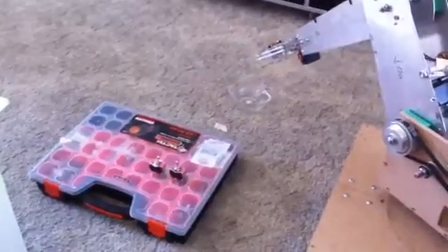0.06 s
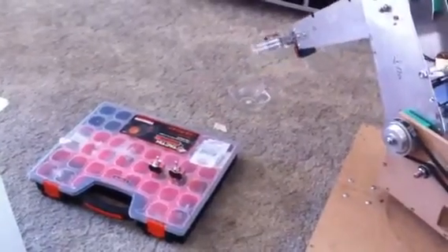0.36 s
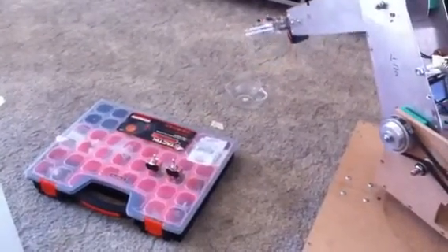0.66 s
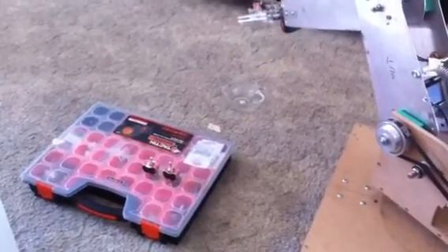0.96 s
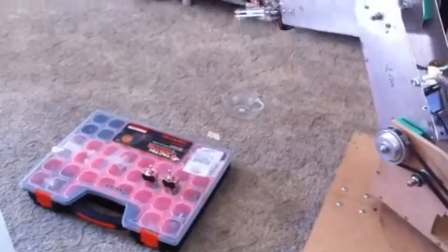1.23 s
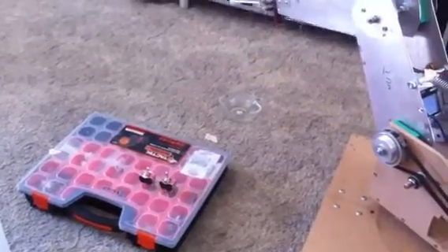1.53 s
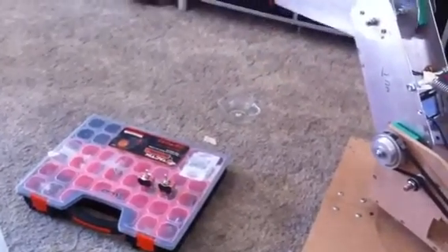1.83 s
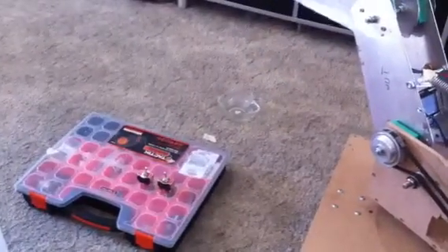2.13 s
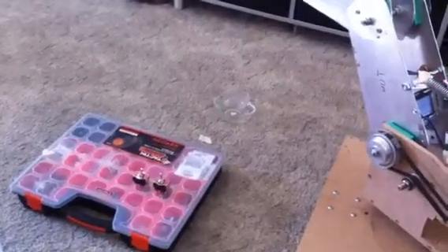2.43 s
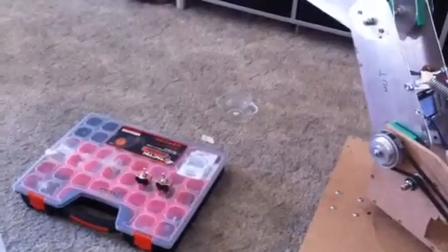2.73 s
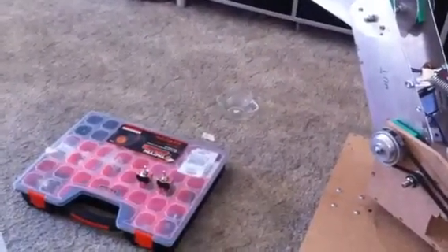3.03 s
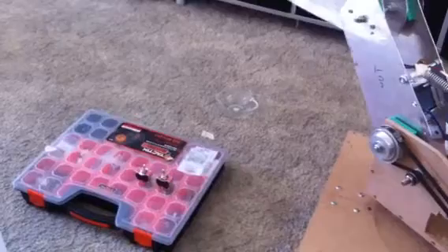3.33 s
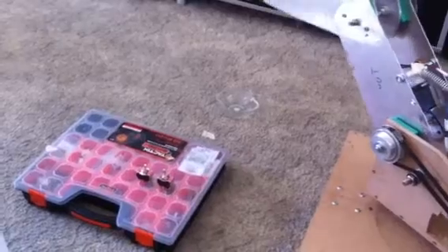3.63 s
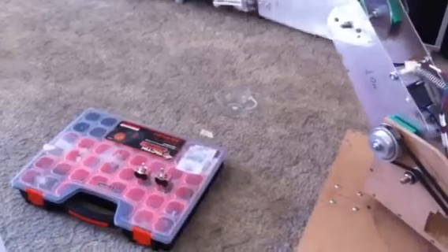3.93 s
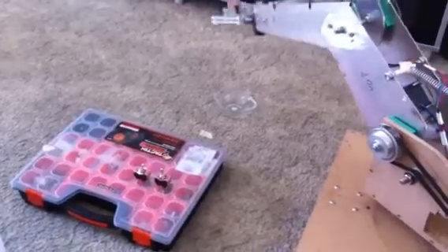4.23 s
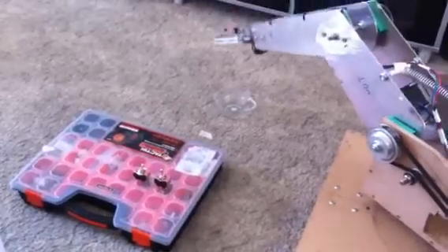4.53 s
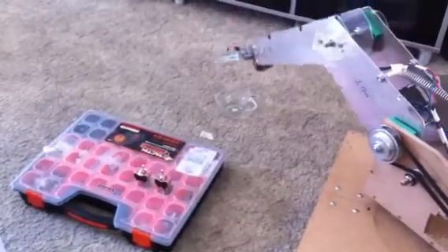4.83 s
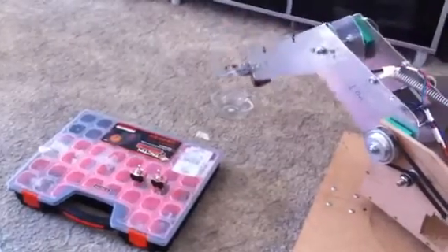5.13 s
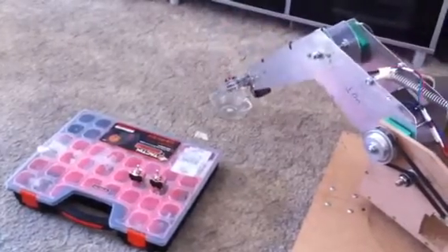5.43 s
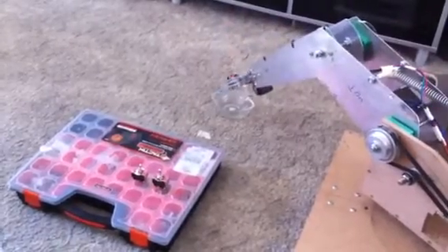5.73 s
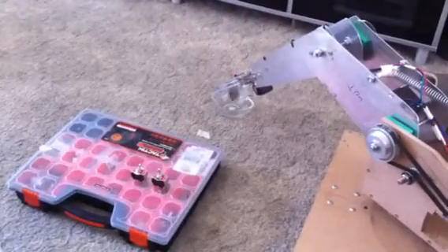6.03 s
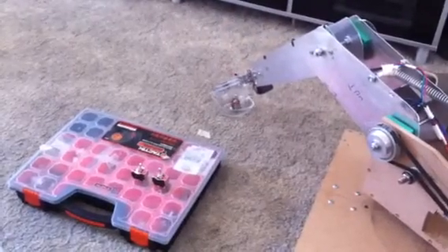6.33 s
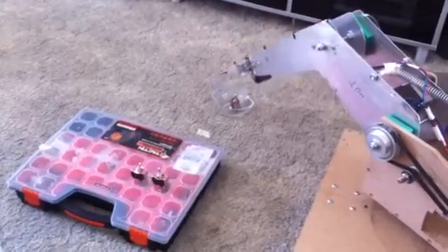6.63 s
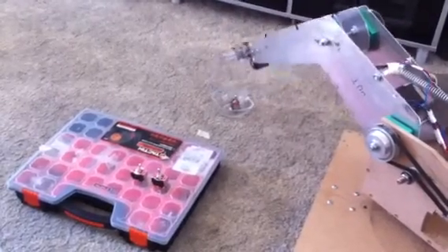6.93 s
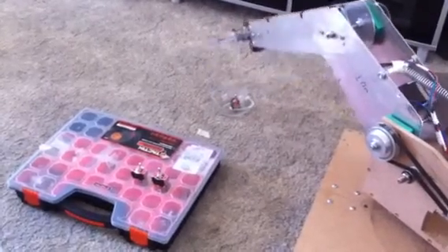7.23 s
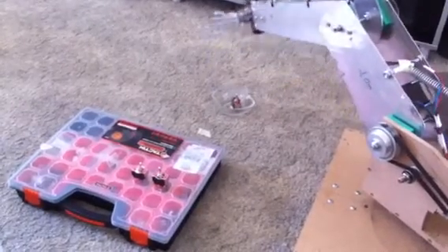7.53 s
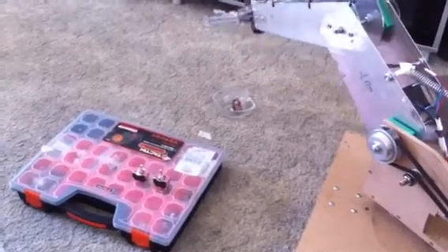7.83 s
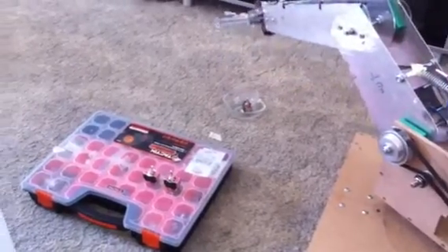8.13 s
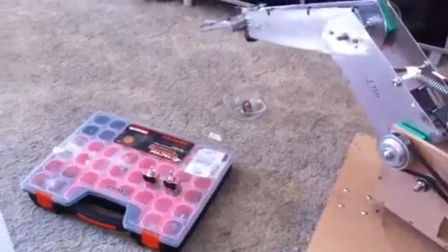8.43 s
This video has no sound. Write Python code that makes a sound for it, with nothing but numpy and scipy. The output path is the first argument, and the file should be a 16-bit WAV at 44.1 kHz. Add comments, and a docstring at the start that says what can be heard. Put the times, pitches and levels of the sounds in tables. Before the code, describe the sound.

A homemade robot arm moves in a carpeted room, close to a small microphone. After a brief whine, a stepper motor buzzes over grinding gears, pauses, then drones again. A small servo whirrs and a metal part drops into a glass dish with one sharp, ringing click. The motor buzzes once more with light ticks and gives way to softer whining, with a faint electrical sizzle throughout.

```python
"""Homemade robot arm at work

A carpeted room, a small microphone close to the arm. Stepper motors lift, lower and lift it again,
jolting the frame into a buzzing drone over grinding gears. Lighter motors whine before and after,
and the powered coils sizzle. Between the swings down and up, a servo works the gripper, which drops
a small metal part into a glass dish with one sharp, ringing click."""
import sys
import numpy as np
from scipy import signal
from scipy.fft import rfft, irfft, next_fast_len
from scipy.io import wavfile
from scipy.ndimage import uniform_filter1d, map_coordinates

SR = 44100
rng = np.random.default_rng(int(sys.argv[2]) if len(sys.argv) > 2 else 0)


def dump_mix(stems):
    """Bounce the given channels to the path in sys.argv[1] as a 16-bit WAV at rate SR."""
    frames = np.atleast_2d(stems).T  # one column per channel
    limited = np.clip(frames, -1, 1)  # hard clip at full scale
    pcm = np.round(limited * 32767).astype(np.int16)
    wavfile.write(sys.argv[1], SR, pcm)


N = 382347
T = np.arange(N) / SR
CYCLE_HZ, STEPS_PER_CYCLE, FIRST_STEP_S = 38.02, 8, 0.326  # the stepper drive

# the stepper's first lift: start_s, stop_s
LIFT_RUNS = [(.32, 2.59)]
# its swings, down and then up: start_s, stop_s
SWING_RUNS = [(3.152, 5.485), (6.583, 7.765)]
# high modes of the motor housings: pitch_hz, width_hz, level_db
COIL_MODES = [(4250, 34, -4), (4335, 25, 0), (4400, 19, 2.5), (4485, 24, -4), (4770, 19, -8)]
# spectrum of the booming side plates: frequency_hz, level_db
PLATE_SPECTRUM = [(150, -36.5), (235, -17), (268, 3.5), (300, -19), (345, -13), (500, -68)]


def amp(db):
    """Decibels to gain."""
    return 10 ** (np.asarray(db) / 20)


def unit(x):
    """Scale to rms 1."""
    return x / np.sqrt(np.mean(x ** 2) + 1e-20)


def along(points, hz):
    """Read (frequency_hz, value) points on a log frequency axis."""
    frequencies, values = np.transpose(points)
    return np.interp(np.log(hz + 1), np.log(frequencies + 1), values)


def wobble(knots_per_s, t=T):
    """A smooth random curve."""
    return map_coordinates(rng.standard_normal(int(t[-1] * knots_per_s) + 5), [t * knots_per_s])


def progress(start, stop):
    """0 at the start of a run, rising evenly to 1 at its stop."""
    return np.clip((T - start) / (stop - start), 0, 1)


def swell(middle_s, half_length_s):
    """A smooth bump of height 1."""
    return np.exp(-.5 * ((T - middle_s) / half_length_s) ** 2)


def surge(cycles, depth):
    """A gain that peaks once a cycle."""
    return np.exp(depth * np.cos(2 * np.pi * cycles))


def running(runs, rise_s, fall_s):
    """1 while a motor runs, dying away after each stop."""
    return sum(progress(on, on + rise_s) * np.exp(-np.maximum(T - off, 0) / fall_s) for on, off in runs)


def filtered(x, response):
    """Filter x by a gain given as a function of frequency."""
    size = next_fast_len(N + SR // 2)
    return irfft(rfft(x, size) * response(np.fft.rfftfreq(size, 1 / SR)), size)[:N]


def noise(spectrum, drive=1):
    """Coloured noise of rms 1, excited in proportion to drive."""
    return unit(filtered(drive * rng.standard_normal(N), lambda hz: amp(along(spectrum, hz))))


def resonant(modes, drive=1):
    """Noise of rms 1 ringing in narrow modes of alternating sign."""
    def response(f):
        return sum((-1) ** k * amp(db) * 1j * f * width / (hz * hz - f * f + 1j * f * width)
                   for k, (hz, width, db) in enumerate(modes))
    return unit(filtered(drive * rng.standard_normal(N), response))


def drive_cycles(slop):
    """Drive cycles since the first step; the rotor hunts slightly about its clocked position."""
    return CYCLE_HZ * (T - FIRST_STEP_S) + slop * (wobble(12) + wobble(45))


def whines():
    """Light motors each sing one unsteady tone; the first also whirrs and rings its gears."""
    # light motor runs: start_s, stop_s, first_pitch_hz, last_pitch_hz, level_db
    runs = [(0, 0.321, 370.7, 348, -51), (7.768, 8.632, 322.4, 313.5, -53), (8.272, 8.647, 530, 530, -50.5)]
    # the first motor's gear tones: pitch_hz, width_hz, level_db
    gear_modes = [(1440, 18, -9), (1600, 32, -22), (1730, 25, -10), (1886, 33, 1), (2033, 18, 2.5),
                  (2650, 44, -11), (4160, 27, -2), (4320, 16, -7), (4450, 20, -6), (4470, 11, 7),
                  (4660, 14, -6)]
    # its whirr: frequency_hz, level_db
    whirr_spectrum = [(110, -36), (190, -11), (260, 3.5), (350, -3.0), (450, -8), (540, -9),
                      (800, -28), (1300, -32.5)]
    tones = np.zeros(N)
    for start, stop, first_hz, last_hz, db in runs:
        hz = first_hz + (last_hz - first_hz) * progress(start, stop) ** 3.1  # a slowing motor sags late
        phase = 2 * np.pi * np.cumsum(hz * (1 + 0.005 * wobble(30))) / SR
        level = running([(start, stop)], rise_s=0.012, fall_s=0.028) * amp(db + 1.7 * wobble(25))
        tones += level * unit(np.sin(phase))
    whirr = amp(-53.5) * noise(whirr_spectrum)
    gear_ring = amp(-51.5) * resonant(gear_modes)
    return tones + running([runs[0][:2]], rise_s=0.0012, fall_s=0.018) * (whirr + gear_ring)


def coils():
    """Chopped coil current makes the motor housings sizzle and whistle, even at rest."""
    # coils under current: on_s, off_s, low_ring_gain_db, high_ring_gain_db
    runs = [(0, 0.34, -54, -57), (.33, 2.61, -53.5, -61.5), (2.63, 3.33, -62.5, -77),
            (3.62, 5.45, -62, -74.5), (5.47, 9.3, -63.5, -80)]
    # low modes of the motor housings: pitch_hz, width_hz, level_db
    housing_modes = [(1436, 26, -9), (1554, 43, -6.5), (1733, 36, -4), (1808, 19, -2), (1885, 38, -7.5),
                     (1995, 75, -5), (2325, 45, -10), (2670, 93, -12.5)]
    # spectra of the low ring, high ring, whistle and idle noise: frequency_hz, level_db
    low_spectrum = [(1100, -45), (1550, -11.5), (1800, -4.5), (2050, -1), (2420, -6.5), (2680, -10),
                    (3000, -19), (5000, -38)]
    high_spectrum = [(2800, -23), (3900, -13), (4250, -10), (4480, -8), (4750, -13), (5400, -23),
                     (6200, -17), (9000, -45)]
    whistle_spectrum = [(4100, -31), (4420, -9), (4650, -28), (4820, -7.5), (4950, 3.5), (5090, -11),
                        (5500, -42)]
    idle_spectrum = [(25, 2.5), (70, -30), (130, -20), (270, -7.5), (420, -8.5), (530, -1), (800, -15.5),
                     (1300, -20), (2100, -24), (3300, -25.5), (6300, -26), (8700, -29), (10500, -31),
                     (12300, -23), (14300, -36), (15500, -32)]
    # in the lift the low ring pulses with the drive and the high ring grows
    lifting = running(LIFT_RUNS, rise_s=.01, fall_s=.03)
    pulsing = surge(drive_cycles(slop=0.035) - .44, depth=0.1 * lifting)
    growth_db = 4 * lifting * progress(*LIFT_RUNS[0]) ** 2
    chatter = surge(179 * T, depth=0.17) * np.exp(0.17 * wobble(300))
    low = amp(-4) * noise(low_spectrum, chatter * pulsing)
    low += amp(-3.5 + 1.1 * wobble(40)) * resonant(housing_modes, chatter * pulsing)
    high = amp(-2.5) * noise(high_spectrum, chatter) + amp(-5) * resonant(COIL_MODES, chatter)
    high *= amp(growth_db)
    sizzle = np.zeros(N)
    for on, off, low_db, high_db in runs:
        powered = running([(on, off)], rise_s=0.0025, fall_s=0.012)
        sizzle += powered * (amp(low_db) * low + amp(high_db) * high)
    whistle = amp(-70.5 + 2.1 * wobble(9)) * noise(whistle_spectrum)
    return sizzle + whistle + amp(-55.5) * noise(idle_spectrum)


def frame_buzz(overtones, cycles, size=2048):
    """Each drive cycle jolts the frame, which rings on until the next jolt."""
    multiples = np.arange(size // 2 + 1)
    gain = amp(np.interp(multiples, *np.transpose(overtones), left=-45, right=-70))
    cepstrum = irfft(np.log(gain))
    jolt = irfft(np.exp(rfft(2 * cepstrum[1:size // 2], size)))  # minimum phase: the energy comes first
    return unit(np.interp(cycles % 1 * size, np.arange(size), jolt - jolt.mean()))


def registers(x, edges_hz=(420, 720)):
    """The low, middle and top parts of x, each of rms 1."""
    low, below_top = [filtered(x, lambda hz: 1 / (1 + (hz / edge) ** 20)) for edge in edges_hz]
    return unit(low), unit(below_top - low), unit(x - below_top)


def teeth(cycles, depth):
    """Gear teeth bite hardest twice a drive cycle."""
    return surge(2 * cycles, depth)


def lift():
    """The stepper raises the forearm; its throbbing buzz brightens as the arm rises."""
    # the frame's answer to one drive cycle: cycle_rate_multiple, level_db
    overtones = [(3, -47), (4, -34), (5, -6.5), (6, -1.5), (7, -7.5), (8, -18), (9, -22), (10, -12),
                 (11, -16), (12, -20), (13, -19.5), (14, 3), (15, -4.5), (16, 1.5), (17, -10), (18, -27),
                 (20, -16), (22, -44), (27, -27), (28, -18), (29, -35), (30, -15.5), (32, -35), (37, -46),
                 (38, -22), (39, -50), (40, -21), (45, -46), (48, -14.5), (50, -41), (55, -39), (63, -47),
                 (70, -29), (80, -79)]
    # drone, middle buzz, top overtones, step tone and grind: start_db, stop_db, power_of_height
    layers = [(-50, -60, 2.3), (-48, -47.5, 0.84), (-68, -57.5, 0.8), (-41.5, -51.5, 0.32), (-53, -52, 1.8)]
    start, stop = LIFT_RUNS[0]
    spin_up_s, top_lag_s = 0.058, 0.011
    height = progress(start, stop)
    drone_db, middle_db, top_db, tone_db, grind_db = [
        first + (last - first) * height ** power for first, last, power in layers]
    # the gears' grind under the lift: frequency_hz, level_db
    grind_spectrum = [(100, -55), (160, -17), (230, 6), (320, -1), (450, 1), (570, -1.5), (760, -10),
                      (1100, -10.5), (1330, -15.5), (1820, -9.5), (2600, -20), (3400, -15.5), (4400, -28),
                      (5500, -25.5), (9000, -30)]
    cycles = drive_cycles(slop=0.0014)
    low, middle, top = registers(frame_buzz(overtones, cycles))
    buzz = amp(drone_db + 1.4 * wobble(7.24)) * low
    buzz += amp(middle_db + 0.7 * wobble(30.65)) * progress(start, start + spin_up_s) * middle
    buzz += amp(top_db) * np.interp(T - top_lag_s, T, top)
    step_tone = amp(tone_db + 0.39 * wobble(7.94)) * unit(np.sin(2 * np.pi * STEPS_PER_CYCLE * cycles))
    grind = amp(grind_db) * noise(grind_spectrum, teeth(cycles - .2, depth=.45))
    slack = 1 - 0.22 * np.exp(7.2 * (np.cos(2 * np.pi * (cycles - 0.92)) - 1))  # a dip before each jolt
    return running(LIFT_RUNS, rise_s=0.0046, fall_s=0.068) * slack * (buzz + step_tone + grind)


def rasp():
    """The gearbox rasps through the lift in short, uneven bursts, pulsing with the teeth."""
    # close gearbox modes: pitch_hz, width_hz, level_db
    gearbox_modes = [(1766, 22, -2), (1828, 9.9, 4.5), (1980, 12, -5)]
    bursts = amp(4 * np.tanh(wobble(28))) * teeth(drive_cycles(slop=0.036) - .2, depth=0.26)
    level = amp(-57.5) * running(LIFT_RUNS, rise_s=.02, fall_s=.03)
    return level * unit(bursts * resonant(gearbox_modes))


def singing(buzz, edge_s=0.06, half_width_hz=22.4):
    """The frame resonates with one overtone after another as the arm changes shape."""
    # resonances in certain poses: start_s, stop_s, pitch_hz, gain_db
    poses = [(1.37, 2.64, 554, 6), (1, 2.75, 554, 2), (1.3, 2.75, 1064, 3), (0.82, 1.7, 600, 2),
             (3.84, 4.14, 590, 7), (4.29, 4.4, 532, 7), (5.1, 5.55, 608, 2.5), (5.9, 6.7, 608, 2.5),
             (7.5, 7.5, 600, 3)]
    out = buzz.copy()
    for start, stop, ring_hz, db in poses:
        held = (np.tanh((T - start) / edge_s) - np.tanh((T - stop) / edge_s)) / 2
        overtone = filtered(buzz, lambda hz: 1 / (1 + ((hz - ring_hz) / half_width_hz) ** 4))
        out += (amp(db * held) - 1) * overtone
    return out


def shudders():
    """The side plates shake briefly as the arm jerks."""
    # shakes of the plates: middle_s, half_length_s, level_db
    shakes = [(.98, .04, -49), (2.678, .046, -53.5), (3.41, .03, -46.5), (3.73, 0.049, -51),
              (4.003, 0.036, -46.5), (4.52, 0.06, -47), (5.47, 0.017, -41), (6.594, 0.016, -44),
              (6.748, 0.016, -44), (6.872, .018, -43)]
    return sum(amp(db) * swell(s, half_length) for s, half_length, db in shakes) * noise(PLATE_SPECTRUM)


def drifting(x, depth_db, size=4096):
    """Each overtone of x swells and fades on its own as the arm changes shape."""
    spectra = signal.stft(x, nperseg=size)[2]
    drift = uniform_filter1d(rng.standard_normal(spectra.shape), size=5, axis=0)  # smooth in frequency
    drift = uniform_filter1d(drift, size=3, axis=1)  # and in time
    return signal.istft(spectra * amp(depth_db * unit(drift)), nperseg=size)[1][:N]


def swing():
    """The arm swings down, then up; under load the step tone swells and the side plates boom along."""
    # the frame's answer to one drive cycle: cycle_rate_multiple, level_db
    overtones = [(3, -38), (4, -33), (5, -10), (6, -0.5), (7, -2.5), (8, -15), (9, -4), (10, -7), (11, -21),
                 (12, -31), (13, -25), (14, 10), (15, -4), (16, 9.5), (17, -18.5), (18, 1.5), (20, 0.5),
                 (21, -23.5), (22, 3), (23, -8.5), (24, 6), (25, 4.5), (26, 3.5), (27, -14), (29, -39),
                 (30, -9), (32, -28), (35, -9), (37, -26), (39, -10.5), (44, -42), (55, -15.5), (65, -45),
                 (67, -16), (69, -42), (80, -50)]
    # load on the stepper going down and up, as a gain on its step tone: time_s, gain_db
    load_down = [(3.17, -55), (3.23, -42.5), (3.451, -43), (3.62, -52), (4.66, -47), (4.67, -43),
                 (5.04, -38), (5.46, -39.5)]
    load_up = [(6.61, -38.5), (7.22, -40), (7.74, -45.5)]
    load_db = np.interp(T, *np.vstack([load_down, load_up]).T)
    extra_db = load_db - np.mean([db for s, db in load_down])
    cycles = drive_cycles(slop=0.0018) - .35
    low, middle, top = registers(drifting(frame_buzz(overtones, cycles), depth_db=1.5))
    buzz = amp(-55 + 0.25 * extra_db + 0.57 * wobble(3.99)) * low
    buzz += amp(-50.5 + 2.2 * wobble(11)) * middle
    buzz += amp(-54 + 0.3 * wobble(13)) * top
    tone_db = load_db - 0.5 + 0.94 * wobble(12)
    step_tone = amp(tone_db) * unit(np.sin(2 * np.pi * STEPS_PER_CYCLE * cycles))
    boom = amp(-53.5 + 0.48 * extra_db) * noise(PLATE_SPECTRUM)
    return running(SWING_RUNS, rise_s=0.013, fall_s=0.019) * (buzz + step_tone + boom)


def gears():
    """Gears and belts grind through both swings, then creep on and growl in a last, slow move."""
    # spectra of the gears swinging, creeping and growling: frequency_hz, level_db
    swing_spectrum = [(100, -44), (180, -16.5), (280, -9), (420, -15.5), (560, -11), (760, -13.5),
                      (1000, -11), (1130, -19.5), (1450, -16.5), (1750, -22), (2150, -19.5), (2700, -23.5),
                      (3100, -33.5), (6000, -38)]
    creep_spectrum = [(100, -43), (180, -19), (280, -5), (420, -26), (580, -7.5), (800, -11.5), (980, -6.5),
                      (1130, -20.5), (1450, -19), (1750, -23), (2150, -22.5), (2700, -23.5), (3400, -33),
                      (6000, -46)]
    growl_spectrum = [(115, -50), (165, -5.5), (215, -22), (260, 0), (305, 5), (360, 1), (460, 0),
                      (520, -12), (700, -46)]
    # they grind harder as they take up their slack, and bind as the arm reaches down
    take_up_db = 1.5 * sum((T >= on) * np.exp(-np.abs(T - on) / 0.055) for on, off in SWING_RUNS)
    bind_db = 2.5 * swell(middle_s=4.77, half_length_s=0.34)
    swinging = amp(-52.5 + take_up_db + bind_db) * running(SWING_RUNS, rise_s=0.0032, fall_s=0.045)
    creeping = amp(-52.5) * running([(SWING_RUNS[-1][1], T[-1])], rise_s=0.049, fall_s=.05)
    bite = teeth(drive_cycles(slop=0.083), depth=0.18)
    grind = swinging * noise(swing_spectrum, bite) + creeping * noise(creep_spectrum, bite)
    growl = amp(-52) * progress(8.22, 8.35) * noise(growl_spectrum)
    return grind + growl


def joints(tick_t60_s=0.038):
    """Joints and cables rub grainily and tick now and then; some ticks ring the motor housing."""
    # spells of rubbing: middle_s, half_length_s, level_db
    rubs = [(4.01, 0.054, -64), (4.775, 0.34, -65), (7.154, 0.14, -68.5), (8, 1, -67)]
    # joint ticks: start_s, scrape_db, ring_db
    ticks = [(3.979, -56, -73), (4.351, -53, -65.5), (4.576, -69, -75), (4.872, -52, -58),
             (6.588, -44, -64), (6.927, -54, -53), (7.04, -46.5, -57), (7.135, -53, -60),
             (7.186, -46.5, -57), (7.87, -51, -64)]
    # spectrum of the scraping: frequency_hz, level_db
    scrape_spectrum = [(1500, -11), (3500, -7.5), (4700, -5), (6500, -3), (10000, -13), (15500, -16.5)]
    scrape, ring = noise(scrape_spectrum), resonant(COIL_MODES)
    rubbing = sum(amp(db) * swell(s, half_length) for s, half_length, db in rubs)
    out = rubbing * noise(scrape_spectrum, drive=amp(3.7 * wobble(250)))
    for start, scrape_db, ring_db in ticks:
        decay = (T >= start) * amp(-60 * np.abs(T - start) / tick_t60_s)
        out += decay * (amp(scrape_db) * scrape + amp(ring_db) * ring)
    return out


def gripper():
    """A small servo whirrs as it works the jaws."""
    # the servo's run: start_s, stop_s
    runs = [(5.49, 6.55)]
    # its whirr: frequency_hz, level_db
    whirr_spectrum = [(110, -42), (165, -5), (210, -8.5), (290, 9.5), (380, -16), (520, 5), (640, 0.5),
                      (780, -13), (980, 1), (1130, -10.5), (1320, 2.5), (1550, -9), (1850, -20),
                      (2150, -8.5), (2500, -10.5), (3300, -22.5), (5000, -26), (5900, -14), (7500, -27)]
    return running(runs, rise_s=0.03, fall_s=0.02) * amp(-54.5 + 3.2 * wobble(16)) * noise(whirr_spectrum)


def flutter(t, knots_per_s=60, rise_s=0.025):
    """Each ringing tone of the dish wavers in strength and phase as room reflections interfere."""
    share = 0.27 * (1 - np.exp(-t / rise_s))
    waver = (wobble(knots_per_s, t) + 1j * wobble(knots_per_s, t)) / np.sqrt(2)
    return np.sqrt(1 - share) + np.sqrt(share) * waver


def dish_click(crack_t60_s=0.05, ring_rise_s=0.00068):
    """The metal part touches the dish, then lands: both contacts crack and the glass rings in the room."""
    # a light touch, then the full blow: start_s, relative_level_db
    contacts = [(6.2228, -5), (6.2257, -2)]
    # spectrum of metal striking glass: frequency_hz, level_db
    crack_spectrum = [(100, -50), (400, -14), (750, -8.5), (1200, -13.5), (1560, -1), (2400, -2.5),
                      (3900, -12.5), (4900, -3), (5900, -14), (7200, 2.5), (9000, -1), (10500, -10),
                      (12000, -10.5), (14300, -10), (15800, -10.5)]
    # the dish's modes, the strongest in close pairs that beat: pitch_hz, level_db, t60_s
    glass_modes = [(1497, -33, .26), (1610, -31, .12), (1906, -37, .45), (3323, -26.5, .37),
                   (4821, -14.5, .18), (4812, -40, .55), (4950, -28, .13), (6620, -23, .08),
                   (6713, -30, .47), (7054, -14.5, .19), (7061, -33, .43), (7330, -36, .22),
                   (7725, -39, .35), (7840, -14, .06), (7861, -23, .35), (8382, -33, .17), (8619, -36, .21),
                   (8852, -28, .3), (9184, -35, .14), (9641, -37, .15), (10058, -40, .31), (11175, -38, .3),
                   (12240, -39, .28), (12980, -36, .24), (13330, -36, .2), (13590, -37, .27),
                   (13810, -36, .2), (14127, -36, .2), (14346, -32, .23), (15180, -35, .16)]
    blows = sum((T >= s) * amp(db - 60 * np.abs(T - s) / crack_t60_s) for s, db in contacts)
    crack = amp(-17) * blows * noise(crack_spectrum)
    t = np.arange(SR // 2) / SR
    glass = sum(amp(db - 60 * t / t60) * np.imag(flutter(t) * np.exp(2j * np.pi * hz * t))
                for hz, db, t60 in glass_modes)
    onset = round(np.mean([s for s, db in contacts]) * SR)
    ring = np.zeros(N)
    ring[onset:onset + len(t)] = amp(-1) * glass * (1 - np.exp(-t / ring_rise_s))
    return ring + amp(-11) * room(ring) + crack + amp(-2.5) * room(crack)


def room(x):
    """The carpeted room answers after 5 ms; the treble dies first."""
    # reverberation times: frequency_hz, t60_s
    decay_times = [(200, 0.7), (1500, 0.46), (5000, 0.42), (15000, 0.29)]
    hz, t, spectra = signal.stft(rng.standard_normal(SR // 2), SR, nperseg=256)
    decay = amp(-60 * t / along(decay_times, hz)[:, None])
    tail = signal.istft(spectra * decay, SR, nperseg=256)[1]
    return signal.fftconvolve(x, np.pad(tail, (SR // 200, 0)) / np.linalg.norm(tail))[:N]


def scene():
    """The arm from close by, in mono, with the room answering its noises."""
    noises = gears() + coils() + gripper() + joints()
    arm = singing(lift() + swing()) + rasp() + shudders() + whines()
    return (arm + dish_click() + amp(-1) * noises + amp(-7) * room(noises))[None]


def record(dry, bass_cut_hz=105, top_hz=15800):
    """A small microphone drops the bass and keeps nothing above its band limit."""
    thin = signal.sosfilt(signal.butter(3, bass_cut_hz, "high", fs=SR, output="sos"), dry[0])
    return filtered(thin, lambda hz: np.clip((top_hz - hz) / 300 + .5, 0, 1))[None]


dry = scene()
out = record(dry)
dump_mix(out)
```